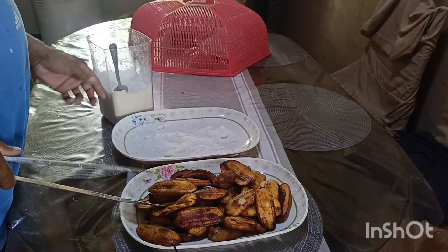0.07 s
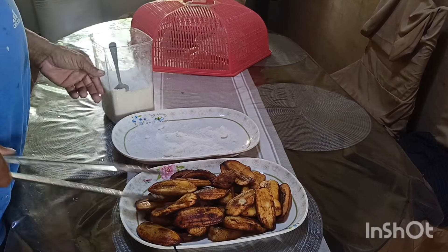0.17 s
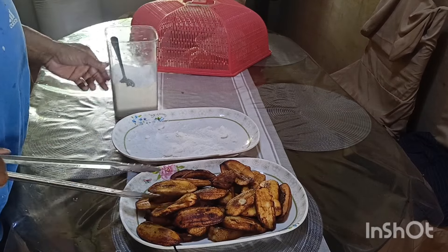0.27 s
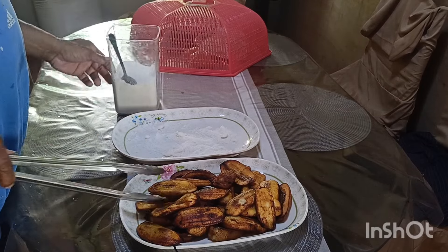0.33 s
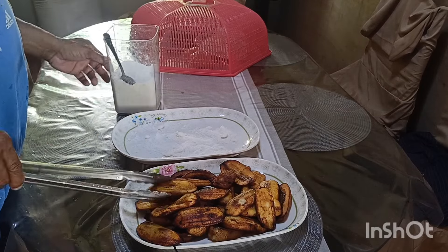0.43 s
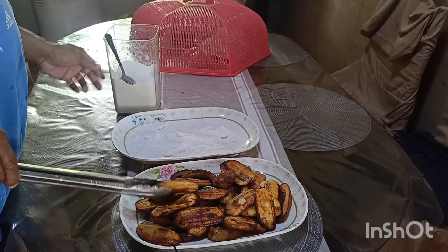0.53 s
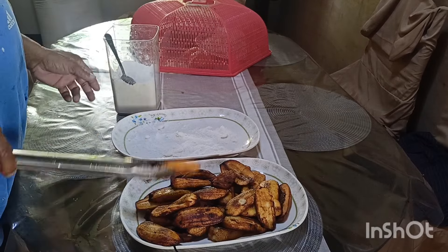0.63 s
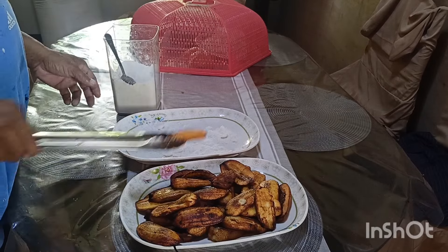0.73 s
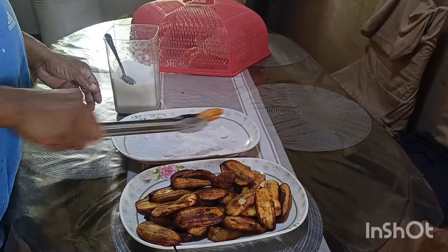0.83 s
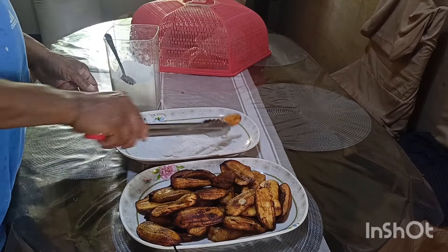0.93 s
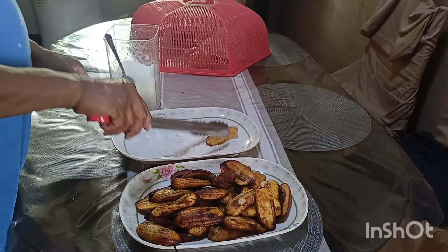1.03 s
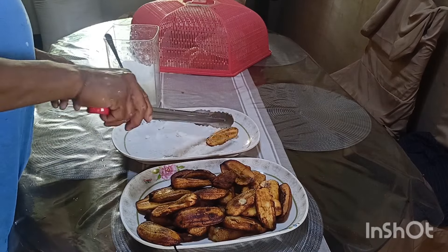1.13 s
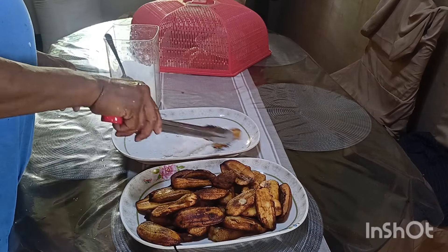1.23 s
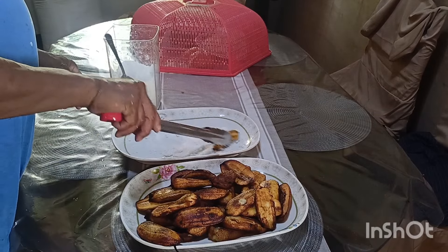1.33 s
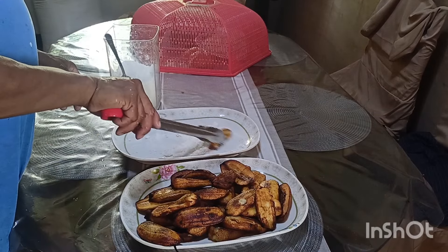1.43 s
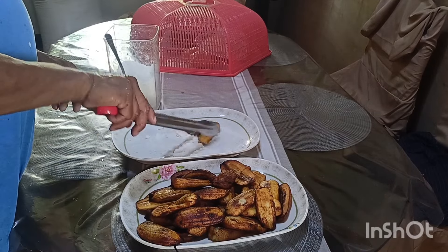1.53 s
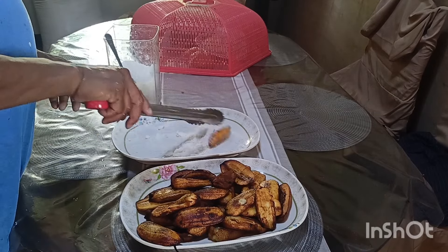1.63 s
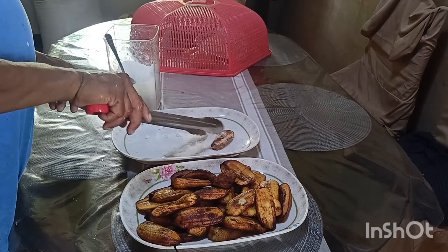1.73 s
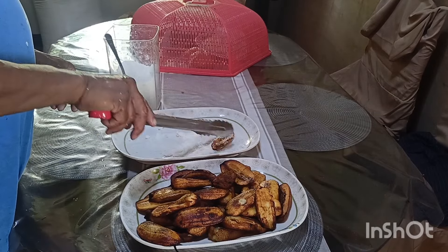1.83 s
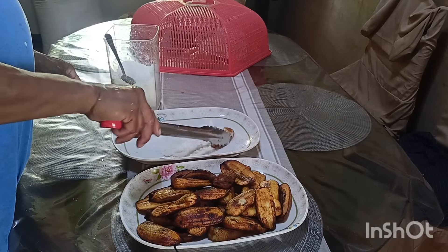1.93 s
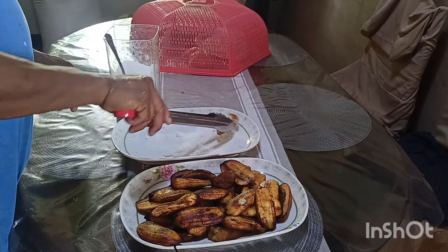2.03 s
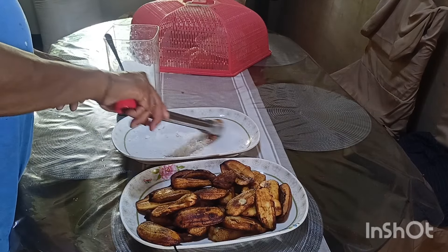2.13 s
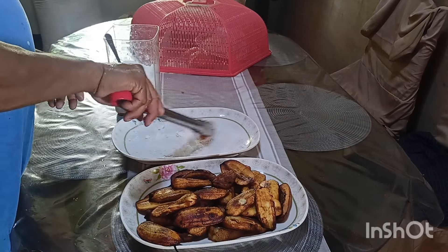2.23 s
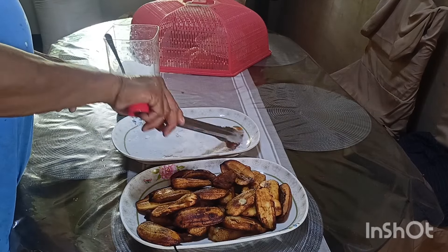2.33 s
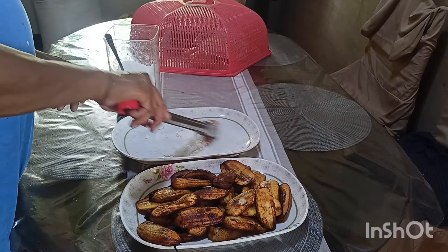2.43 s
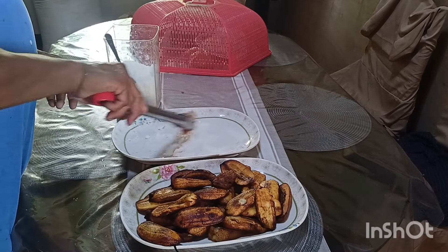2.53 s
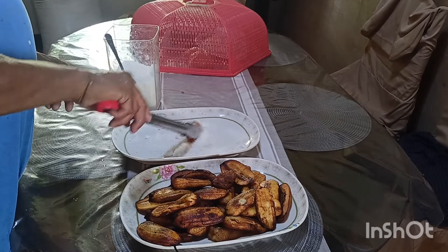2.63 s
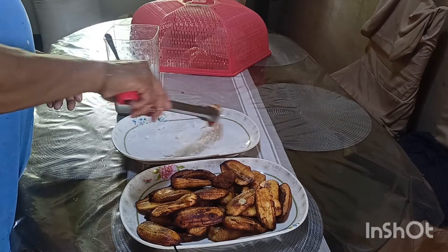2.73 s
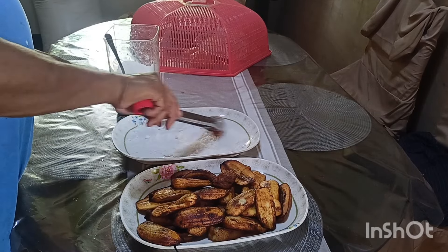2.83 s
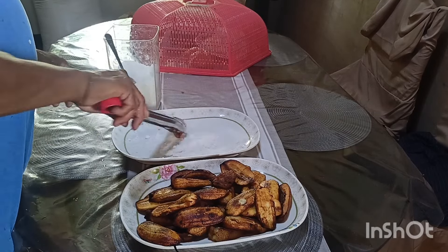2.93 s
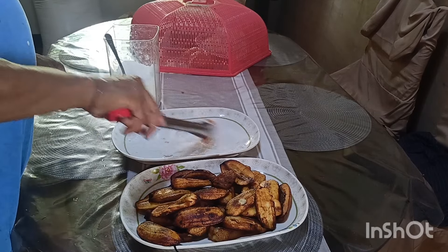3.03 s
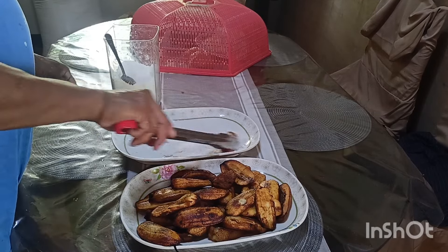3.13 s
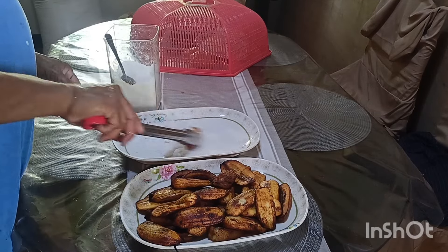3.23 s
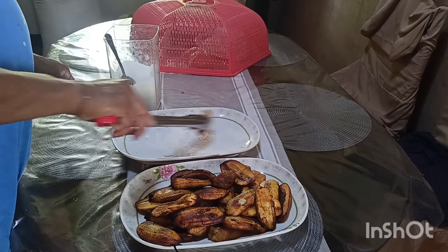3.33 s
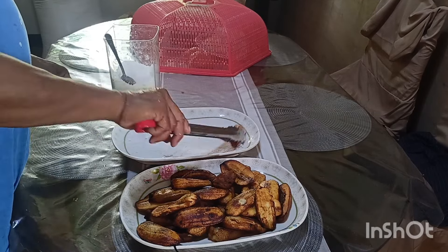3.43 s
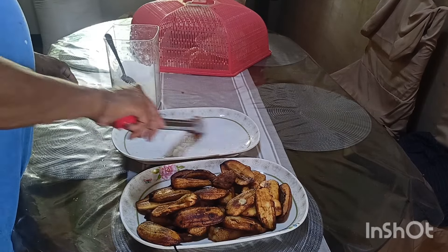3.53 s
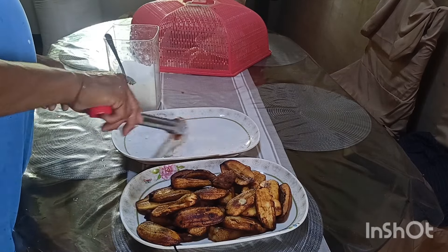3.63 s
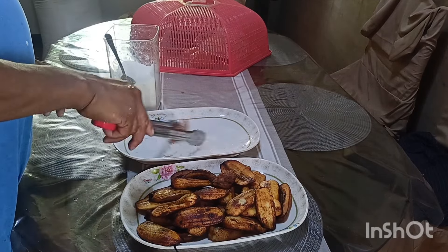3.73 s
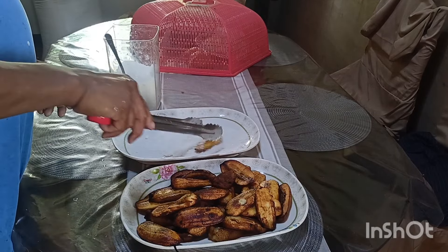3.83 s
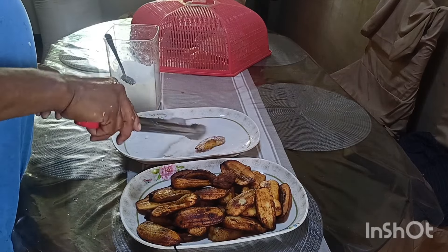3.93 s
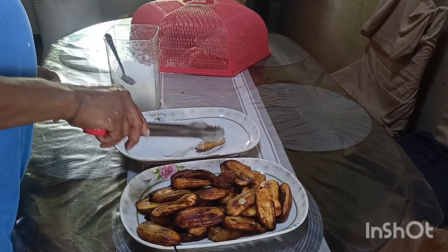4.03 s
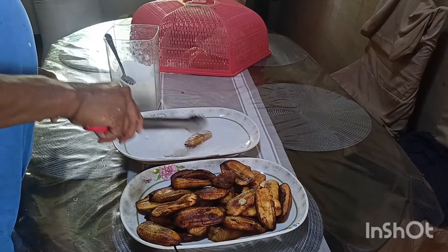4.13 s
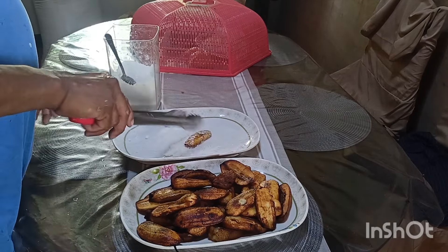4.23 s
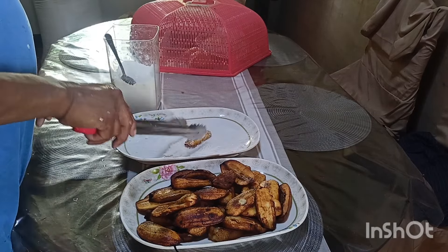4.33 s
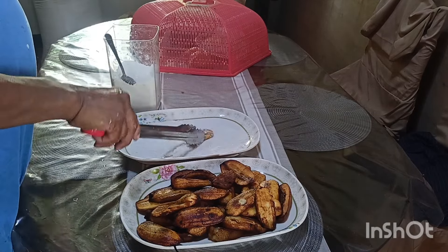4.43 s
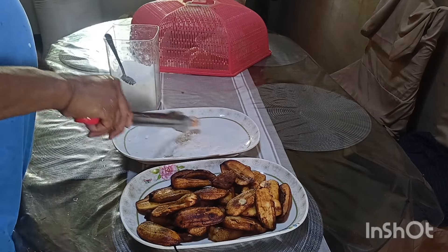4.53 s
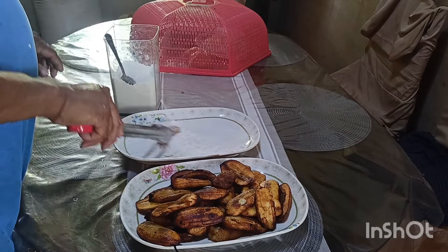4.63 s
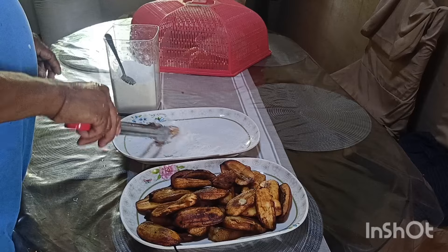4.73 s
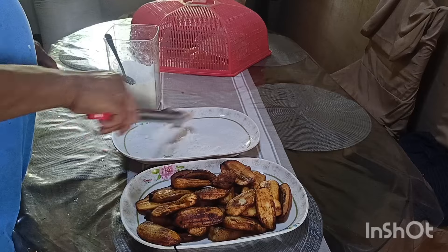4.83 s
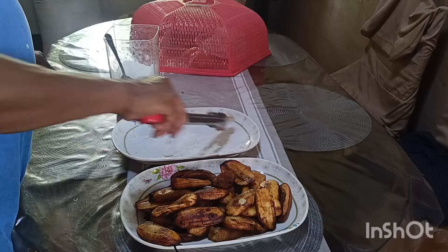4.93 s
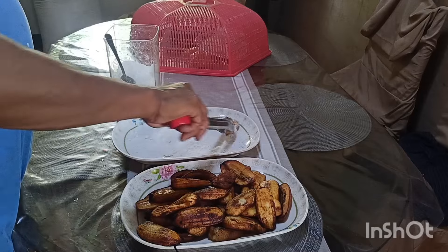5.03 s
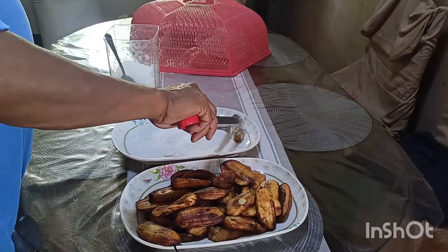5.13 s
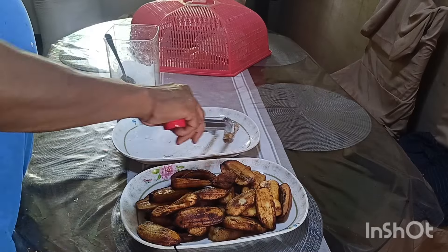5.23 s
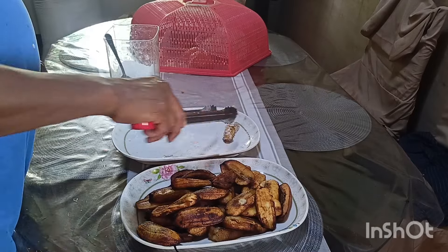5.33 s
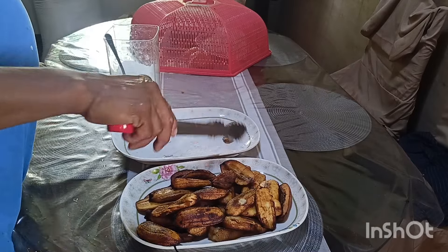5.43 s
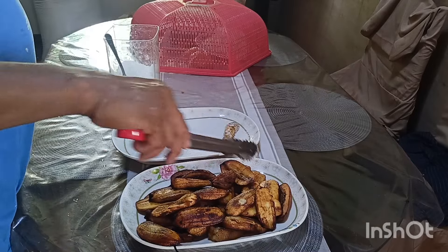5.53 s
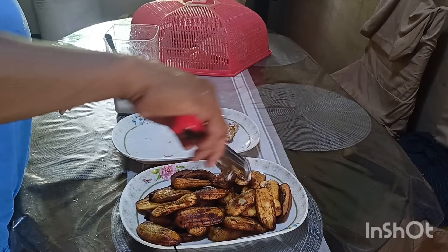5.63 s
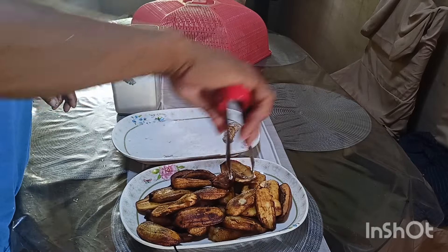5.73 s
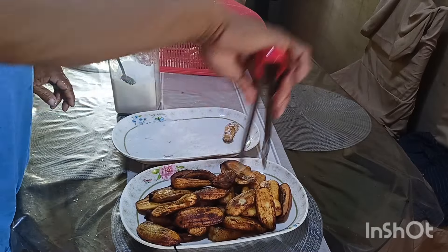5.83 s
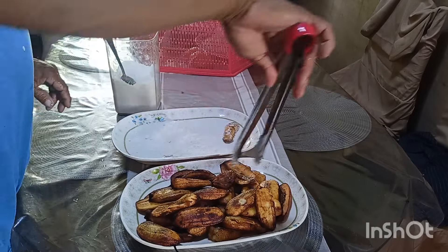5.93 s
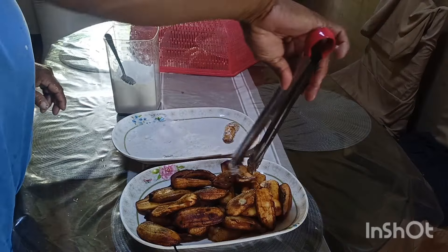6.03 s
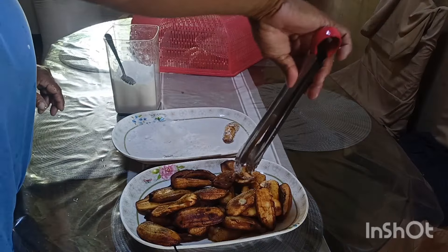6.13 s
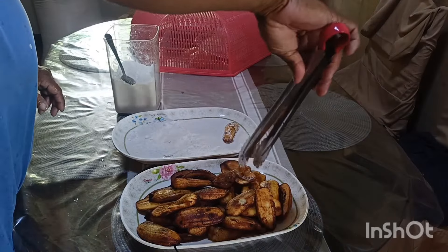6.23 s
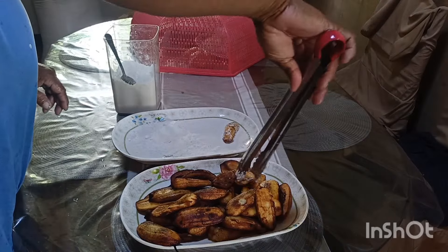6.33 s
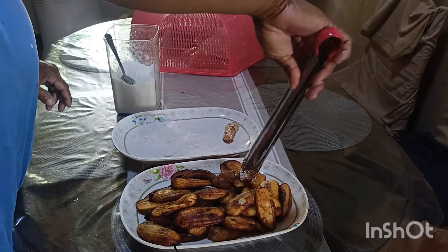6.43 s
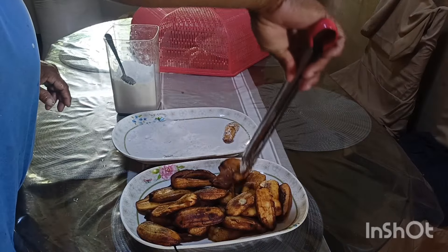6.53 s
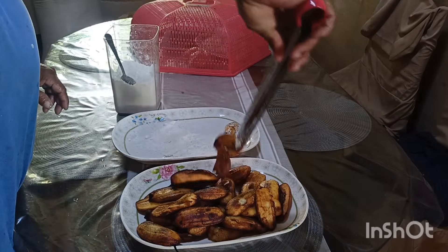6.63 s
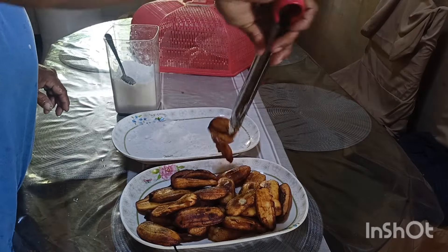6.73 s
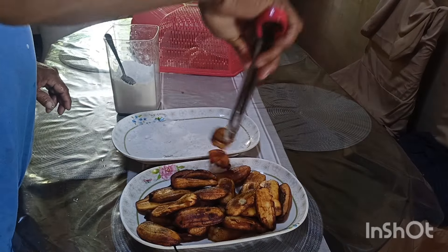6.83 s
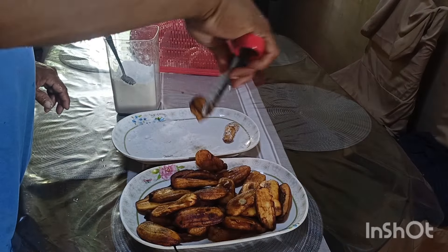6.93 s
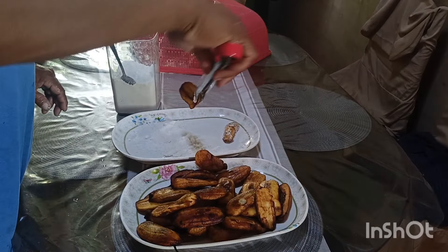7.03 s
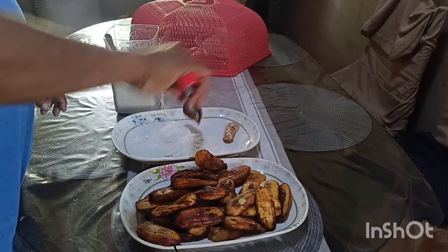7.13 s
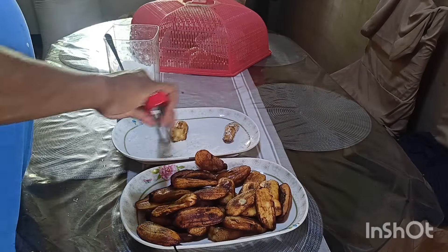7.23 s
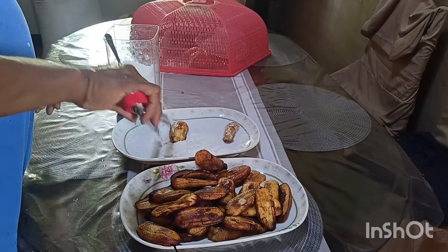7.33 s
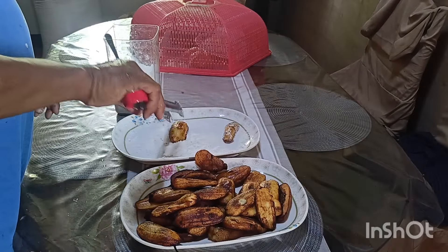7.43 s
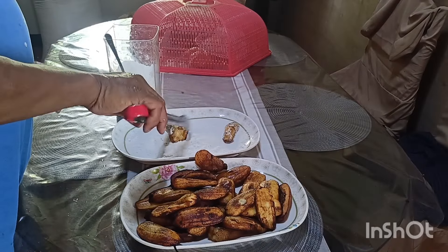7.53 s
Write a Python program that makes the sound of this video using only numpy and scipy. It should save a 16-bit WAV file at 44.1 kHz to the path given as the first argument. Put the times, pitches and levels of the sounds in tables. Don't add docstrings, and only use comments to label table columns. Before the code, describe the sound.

Metal tongs scrape gritty sugar across a ceramic plate, with sharp clinks and short rings, over a faint indoor fan hum.

```python
import sys
import numpy as np
from scipy import signal
from scipy.fft import irfft, next_fast_len
from scipy.io import wavfile
from scipy.ndimage import uniform_filter1d

SR = 44100
rng = np.random.default_rng(int(sys.argv[2]) if len(sys.argv) > 2 else 0)


def wrap_up_sound(samples):
    columns = np.atleast_2d(samples).T
    tamed = np.clip(columns, -1, 1)
    steps = np.round(tamed * 32767).astype(np.int16)
    wavfile.write(sys.argv[1], SR, steps)


def gain_from_db(level_db):
    decades = np.asarray(level_db, float) / 20
    return 10 ** decades


N = 333837


def evened(x):
    return x / np.sqrt(np.mean(x ** 2) + 1e-20)


def read(points, hz):
    f, value = np.transpose(points)
    return np.interp(np.log(hz + 1), np.log(f + 1), value)


def add(mix, s, sound):
    part = mix[:, round(s * SR):][:, :sound.shape[1]]
    part += sound[:, :part.shape[1]]


def causal(gain_db, size=4096):
    log_gain = np.log(gain_from_db(np.maximum(gain_db, -90)))
    log_gain = np.concatenate([log_gain, log_gain[-2:0:-1]])
    response = np.fft.ifft(np.exp(np.conj(signal.hilbert(log_gain)))).real[:size]
    return response / np.linalg.norm(response)


def fuzzy(hz, width):
    size = next_fast_len(N)
    off = np.fft.rfftfreq(size, 1 / SR) - hz
    near = np.flatnonzero(abs(off) < 8 * width)
    z = np.zeros(len(off), complex)
    a, b = rng.standard_normal((2, len(near)))
    z[near] = (a + 1j * b) * (1 + (2 * off[near] / width) ** 2) ** -1.5
    return evened(irfft(z, size)[:N])


def air():
    # (frequency [Hz], level per Hz [dB])
    air_curve = [(18, -70), (30, -43), (104, -1.5), (206, -11), (340, -7.5), (577, -16), (1270, -27),
                 (3130, -30), (6900, -33), (8400, -33.5), (9700, -38), (11100, -26), (12500, -42.5),
                 (16000, -29.5)]
    air_db = -62.5
    frames, hz = N // 256 + 5, np.fft.rfftfreq(1024, 1 / SR)
    a, b, patches = rng.standard_normal((frames, 513, 3)).T
    patches = uniform_filter1d(patches, 10, 0)
    patches = evened(uniform_filter1d(patches, 12, 1))
    z = (a + 1j * b) * gain_from_db(read(air_curve, hz)[:, None] + 1.3 * patches)
    hiss = signal.istft(z, nperseg=1024, noverlap=768)[1][:N]
    return gain_from_db(air_db - 3.5) * evened(hiss)


def fan():
    # (frequency [Hz], width [Hz])
    fan_tones = [(114, 13), (156.5, 14), (343.5, 7), (398, 8), (456, 8), (570.5, 8), (628, 10), (1717, 18),
                 (2370, 45), (4600, 70), (6060, 50), (8500, 120)]
    fan_levels = [-72.5, -73.5, -70.5, -77, -80.5, -81.5, -82, -92.5, -110.5, -95, -93, -89]
    turn = 2 * np.pi * np.arange(N) / SR
    hum = np.zeros(N)
    for (hz, width), db in zip(fan_tones, fan_levels):
        core = 0.9 * (hz < 700) * np.sin(hz * turn)
        hum += gain_from_db(db) * evened(fuzzy(hz, width) + core)
    return hum


def insects():
    # (frequency [Hz], width [Hz], level [dB], pulse rate [1/s])
    singers = [
        (11600, 520, -83.5, 147.),
        (11370, 260, -79, 180),
        (10800, 500, -84.5, 124.),
        (11150, 600, -81, 130),
    ]
    early_db, joins_s, rise_s = -6, 1.9, 0.6
    chorus = np.zeros(N)
    for hz, width, db, rate in singers:
        drift = evened(uniform_filter1d(rng.standard_normal(N), size=8000))
        turns = np.cumsum(rate * (1 + 0.039 * drift)) / SR
        pulses = np.exp(1.5 * np.cos(2 * np.pi * turns))
        chorus += gain_from_db(db) * evened(fuzzy(hz, width) * pulses)
    t = np.arange(N) / SR
    return chorus * gain_from_db(early_db / (1 + np.exp((t - joins_s) / rise_s)))


def rumble():
    band = signal.butter(3, [62, 190], "bandpass", fs=SR, output="sos")
    return gain_from_db(-73.5) * evened(signal.sosfilt(band, rng.standard_normal(N)))


def shares(db, body_db, top_db, rim_db):
    return gain_from_db(db + np.array([body_db, 0.67 * body_db + rim_db, 0 * db, top_db]))


def cluster(share, count=60):
    jitter, size, phase = rng.random((3, count, 1))
    t = np.arange(1100) / SR
    hz = 1100 + 170 * (np.arange(count)[:, None] + jitter)
    modes = (gain_from_db(14.3 * size) * np.sin(2 * np.pi * (hz * t + phase))).sum(0)
    modes = modes * gain_from_db(-60 * t / 0.042)
    modes = share * modes / np.linalg.norm(modes) + (t == 0)
    return modes / np.linalg.norm(modes)


def rubs():
    # (start [s], length [s], friction [dB], plate body re steel [dB])
    slides = [(.002, 0.35, -71, -3), (0.725, .34, -80, 3.5), (1.275, 0.24, -49.5, 0),
              (1.638, 0.28, -71.5, 1.5), (2.35, .1, -74, -18), (2.452, .095, -50, -10),
              (2.883, 0.087, -44.5, -1), (3.505, 0.091, -46, -7), (5.301, 0.18, -73.5, 13)]
    # (peak [s], friction [dB], swell [s], fade [s], plate body re steel [dB])
    drags = [(1.566, -30, 0.092, 0.07, -14), (2.188, -54.5, 0.32, 0.4, -2), (2.47, -40, 0.05, 0.05, -10),
             (2.62, -51, 0.0027, 0.021, -6), (2.682, -55.5, 0.074, 0.09, -24),
             (2.972, -37, 0.025, 0.075, -13.5), (3.146, -37, 0.0043, 0.19, -9),
             (3.247, -29, 0.016, 0.099, -20), (3.496, -29.5, 0.0026, .015, -9),
             (3.572, -36.5, 0.027, 0.13, -7), (3.896, -48, .05, 0.08, -11), (4.56, -58, .01, 0.088, -2),
             (4.706, -51.5, 0.081, 0.14, -8.5), (4.79, -55, 0.042, 0.089, -6.5),
             (5.2, -62, 0.27, 0.018, -3), (5.243, -57.5, 0.07, 0.0062, -7), (6.776, -74, .03, .15, 16),
             (7.25, -57, .008, .05, -9), (7.297, -53.5, 0.046, 0.016, -9), (7.38, -63, .01, 0.13, 0)]
    # (peak [s], friction
    # [dB], swell [s], fade [s])
    faint_drags = [(.322, -57.5, 0.027, 0.5), (1.13, -68.5, 0.28, 0.26), (1.262, -56, .03, .005),
                   (3.493, -52, .015, .004), (7.297, -50, .03, .004), (5.014, -61, 0.23, 0.064),
                   (5.736, -63.5, .05, .1), (5.848, -55, .009, .1), (6.052, -57.5, .02, .04),
                   (6.165, -66, 0.07, .05), (6.205, -64.5, .01, .06), (6.454, -54.5, 0.069, 0.17),
                   (6.928, -60, 0.018, .07), (7.458, -56.5, 0.04, 0.07), (7.565, -53, 0.057, .01)]
    faint_body_db = -16
    range_db, body_lag = 26.5, 0.39
    out = []
    for s, length, db, body in slides:
        count = round(length * SR)
        out.append((s, np.full(count, db), np.full(count, body)))
    for peak, db, swell, fade, body in drags + [row + (faint_body_db,) for row in faint_drags]:
        start = max(peak - 1.2 * swell, 0)
        t = np.arange(start, peak + 1.4 * fade, 1 / SR) - peak
        down_db = range_db * np.where(t < 0, -t / swell, t / fade)
        out.append((start, db - down_db, body + body_lag * down_db))
    return out


def strokes():
    out = np.zeros((4, N))
    sizes = gain_from_db(3.8 * np.minimum(rng.exponential(1, N), 3.0))
    grains = sizes * (rng.random(N) < 1500 / SR)
    clumps = gain_from_db(2.06 * evened(uniform_filter1d(rng.standard_normal(N), size=300)))
    grit = evened(grains * rng.standard_normal(N))
    grit = evened((0.5 * grit + rng.standard_normal(N)) * clumps)
    for s, db, body_db in rubs():
        rub = grit[round(s * SR):][:len(db)]
        t = np.arange(len(rub)) / SR
        db, body_db = db[:len(rub)], body_db[:len(rub)]
        edge = np.clip(np.minimum(t / 0.002, (t[-1] - t) / 0.024), 0, 1)
        rub = signal.fftconvolve(rub, cluster(0.4))[:len(t)]
        add(out, s, shares(db, body_db, -6 + 0 * db, -4.5) * edge * rub)
    return out * gain_from_db(-4.0)


def blows():
    # (time [s], blow [dB], plate body re steel [dB], room tail re blow [dB])
    light_ticks = [(.1174, -64, 6, -29), (.2104, -60.5, -9, 1.5), (0.3214, -46.5, -25, -2.5),
                   (0.488, -46.5, -20.5, -22), (.5666, -50.5, -15, -6.5), (1.0385, -50, -12, -5),
                   (2.6184, -58, -9, 3), (2.658, -56, -3, -3), (6.731, -70, 14, -20),
                   (4.6902, -50, -28, -22), (5.474, -63, -1, -29), (5.7314, -55, -18, -17),
                   (5.8481, -55, -22, -9), (6.0462, -53, -24, -11), (6.2, -54, -30, -16),
                   (6.3634, -50.5, -18, -10), (6.389, -51, -23, -15), (6.4313, -48, -24, -21),
                   (6.569, -52, -20, -16), (6.7615, -76, 19.5, -4.5), (7.444, -52, -16, -5),
                   (5.708, -57, -20, -16)]
    # (time [s], blow [dB], plate body re steel [dB], room tail re blow [dB], gate closes after [s])
    flat_taps = [(1.2635, -38, -38, -12, .084), (1.3068, -36, -34, -20, .11), (1.3125, -37, -34, -24, .11),
                 (1.3205, -34, -34, -20, .03), (1.3643, -39, -13.5, 2, 0.17), (1.5055, -33, -13, -21, .12),
                 (1.5529, -27.5, -35, -7, 0.092), (1.5764, -26, -15, -22, .14),
                 (1.9614, -17, -12, -13, 0.13), (2.1515, -36, -14, -16, .14), (2.9678, -31, -22, -12, .1),
                 (2.4906, -24, -34, -22, 0.05), (2.9238, -30.5, -18, -19, .11),
                 (2.9733, -24, -19, -24, 0.13), (3.1436, -36, -14, -8, .11), (3.2011, -30.5, -16, -4, .15),
                 (3.2324, -38, -27, -4, .05), (3.2455, -21, -41, -20, .11), (3.2514, -19, -28, -10, .11),
                 (3.494, -30, -22, -17, .13), (3.7803, -25, -15, -16.5, 0.095),
                 (3.7811, -13, -13.5, -16.5, 0.098), (4.455, -20, -10.5, -13, .1),
                 (3.8034, -27.5, -1, -13, 0.25), (6.4461, -44.5, -24, -10, .11),
                 (6.4567, -38, -27, -17, 0.12), (6.4826, -43, -30, -16, .11), (6.4845, -43, -28, -14, 0.1)]
    # (time [s], blow [dB], plate body re steel [dB], room tail re blow [dB], gate closes after [s])
    edge_taps = [(1.9388, -38, -30, 0, .02), (1.946, -13, -13, -11, .15), (2.8858, -32, -6, -13.5, 0.12),
                 (3.5703, -22.5, -20.5, -2, .1), (4.1061, -53.5, -20, -3, .14),
                 (4.124, -44.5, -14, -7, .15), (3.7782, -41, -25, -4, .02), (4.447, -50, -27, 0, .02),
                 (4.4524, -24, -11, -14, .1), (4.4584, -24.5, -11, -13, .1), (4.4498, -44, -15, -10, .02),
                 (5.2443, -34.5, -9, -13, .078), (4.6129, -50, -26, -9, .11),
                 (4.9072, -46.5, -15, -12, .11), (5.2457, -30.5, -11, -10.5, 0.076),
                 (6.9207, -47, -19, -15, .09), (7.2484, -44.5, -12, -8.5, .096),
                 (7.2978, -36, -14, -10, .083), (7.2996, -30, -7.5, -10, .083), (7.3028, -38, -6, -14, .08),
                 (7.5443, -48.5, -15, -12, .11)]
    # (time [s], blow [dB], plate body re steel [dB], room tail re blow [dB], gate closes after [s])
    arm_clacks = [
        (4.1634, -23, -56, -4, 0.15),
        (4.1754, -19, -29, -11, 0.14),
    ]
    ticks = [row + (0.14,) for row in light_ticks]
    kinds = [(edge_taps, -4), (flat_taps, -15.5), (arm_clacks, -3), (ticks, -18)]
    out = []
    for rows, top_db in kinds:
        for s, db, body_db, tail_db, gate_s in rows:
            out.append((s, db, body_db, top_db, tail_db, gate_s))
    return out


def taps():
    t, out = np.arange(10000) / SR, np.zeros((4, N))
    leak = 0.13
    for s, db, body_db, top_db, tail_db, gate_s in blows():
        z = rng.standard_normal(len(t))
        crack = z * gain_from_db(-60 * t / 0.016) * np.minimum(t / 0.0007, 1)
        crack = crack + 3.8 * (np.arange(len(t)) == 25)
        shut = leak + (1 - leak) / (1 + np.exp((t - gate_s) / 0.006))
        tail = z[::-1] * gain_from_db(tail_db - 60 * t / 0.32) * (1 - np.exp(-t / 0.0051))
        ringing = signal.fftconvolve(0.5 * crack + tail, cluster(0.6))[:len(t)]
        sound = 0.7 * crack + ringing * shut
        add(out, s, gain_from_db(-8.0) * shares(db, body_db + 8.0, top_db, -5.0)[:, None] * sound)
    return out


def rings():
    # (time [s], frequency [Hz], level [dB], lasts [s])
    plate_rings = [(.118, 414, -59, 0.017), (1.946, 436, -38, 0.1), (1.946, 700, -34, 0.114),
                   (1.946, 2100, -43, .07), (2.886, 600, -48, .03), (1.946, 927, -39, 0.11),
                   (1.946, 308, -39.5, 0.053), (1.945, 1900, -39.5, 0.069), (3.781, 402.4, -41, 0.2),
                   (3.781, 2080, -50, 0.04), (3.781, 934, -46, 0.16), (4.454, 602, -41, 0.09),
                   (4.454, 711, -50, .07), (4.454, 1100, -48, .06), (3.781, 590, -37, .1),
                   (3.779, 1804, -49, .1), (4.453, 428.7, -38, 0.105), (4.454, 361, -48, 0.14),
                   (5.241, 715, -48, 0.078), (6.758, 980, -62, .012), (5.241, 935, -47, 0.098),
                   (5.245, 1470, -54, .083), (7.298, 606, -44.5, 0.083), (7.306, 800, -50, .06),
                   (7.306, 310, -52, .07)]
    # (time [s], frequency [Hz], level [dB], lasts [s])
    steel_rings = [(1.946, 3885, -41.5, 0.098), (1.948, 4400, -56, .12), (1.942, 6140, -45, .12),
                   (3.567, 8760, -39, 0.086), (4.161, 6980, -42, 0.14), (4.17, 7670, -40, 0.12),
                   (4.163, 3434, -46, 0.145), (4.163, 5839, -40, 0.15), (7.298, 5220, -55.5, .079),
                   (5.245, 5200, -55, .06), (3.494, 5800, -53, .05), (4.163, 4270, -48, 0.15),
                   (4.163, 7400, -47, .14), (4.163, 6490, -47, .14), (4.163, 7290, -43, .14),
                   (6.457, 3200, -65, .02), (6.484, 3200, -65, .03), (3.144, 5300, -47, .04)]
    # (time [s], frequency [Hz], level [dB], lasts [s])
    dull_rings = [(1.036, 2940, -61, 0.03), (1.263, 8120, -42, 0.06), (1.946, 2947, -35.5, 0.12),
                  (4.454, 7970, -40, 0.064), (5.239, 5140, -53, 0.085), (5.243, 782, -42.5, 0.076),
                  (6.77, 800, -64, .08), (4.165, 3600, -44, .14), (4.165, 4600, -46, .14),
                  (3.2455, 8500, -36, .03), (3.2514, 5800, -40, .02), (3.566, 8000, -41, .07),
                  (2.9678, 7600, -44, .03), (1.3205, 8200, -42, .01), (2.452, 8100, -50, .045),
                  (6.457, 4100, -58, .02), (6.484, 4450, -58, .03), (6.484, 8000, -57, .01)]
    # (time [s], frequency [Hz], level [dB], lasts [s])
    squeaks = [(1.264, 4520, -54, 0.083), (1.306, 7460, -47, .019), (1.364, 5210, -56, 0.14),
               (2.659, 620, -55, 0.043), (4.647, 1500, -64.5, 0.05), (1.64, 590, -65, 0.18),
               (1.5, 5210, -54, .09)]
    # (time [s], frequency [Hz], level [dB], lasts [s])
    knocks = [(4.4524, 401, -27, 0.017), (4.4524, 616, -32, 0.018), (3.7811, 370, -30, 0.015),
              (1.946, 950, -30, .02), (5.2443, 794, -38, .02), (7.2996, 550, -42, .02),
              (1.2635, 8100, -38, .005)]
    # (width [Hz], time to fall 60 dB [s])
    ring_kinds = [
        (22, 0.33),
        (55, .32),
        (316, 0.29),
        (70, 1.2),
        (20, 0.044),
    ]
    t, out = np.arange(9500) / SR, np.zeros((1, N))
    times, strength = np.transpose(blows())[:2]
    tables = zip([plate_rings, steel_rings, dull_rings, squeaks, knocks], ring_kinds)
    sung = [row + kind for rows, kind in tables for row in rows]
    for s, hz, db, lasts, width, t60 in sung:
        a, b = rng.standard_normal((2, len(t)))
        nearest = times[np.argmin(abs(times - s) - strength / 2500)]
        s = nearest if abs(nearest - s) < 0.012 else s
        r = np.exp(-np.pi * width / SR)
        flutter = signal.lfilter([np.sqrt(1 - r * r)], [1, -r], a + 1j * b, zi=[2.47 + 0j])[0]
        shut = (1 - np.exp(-t / 0.00087)) / (1 + np.exp((t - lasts) / 0.0083))
        tone = (flutter * np.exp(2j * np.pi * hz * t)).imag
        add(out, s, (gain_from_db(db - 60 * t / t60) * shut * tone)[None])
    return out[0]


def parts():
    # (frequency [Hz], level [dB], relative ring time [1])
    plate_modes = [(392.5, -4.5, 0.26), (436, -7.5, 1), (596, 10.5, 0.13), (689, 2, 0.028),
                   (726, -27, 0.25), (814, -19, 0.63), (960, -15.5, 1)]
    # (frequency [Hz], width [Hz], level [dB])
    steel_modes = [(3020, 53, 3), (3450, 34, -19.5), (5176, 61, 0.5), (5800, 150, -15), (5850, 58, -6),
                   (7330, 78, -4), (7750, 53, -14), (7800, 28, -5.5), (9140, 64.3, -11), (8760, 18, -9.5),
                   (9160, 90.5, -4.5), (10030, 44, -12), (10550, 33, -6)]
    # (frequency [Hz], level per Hz [dB])
    bright_curve = [(1530, -53.5), (2950, -19), (3350, -7), (3900, -6.5), (5080, -5), (6350, -6), (8050, 0),
                    (9610, -9.5), (12400, -13.5), (16200, -49), (22000, -120)]
    # (frequency [Hz], level per Hz [dB])
    middle_curve = [(600, -32), (850, -1.5), (1150, -1), (1500, 0.5), (2100, -2.5), (2750, -5.5),
                    (3600, -22)]
    # (frequency [Hz], level per Hz [dB])
    top_curve = [(10500, -42), (12500, -6), (14500, -2), (15900, 1.5), (17500, -37)]
    hz, t = np.fft.rfftfreq(16384, 1 / SR), np.arange(8192) / SR
    body = np.zeros(len(t))
    for f, db, t60 in plate_modes:
        body += gain_from_db(db - 60 * t / (0.19 * t60)) * np.sin(2 * np.pi * f * t)
    peaks = np.zeros(len(hz))
    for f, width, db in steel_modes:
        peaks += gain_from_db(2 * (db + 2.5)) / (1 + (2 * (hz - f) / width) ** 2)
    rim = causal(read(middle_curve, hz))
    steel = causal(read(bright_curve, hz) + 10 * np.log10(1 + peaks))
    return body / np.linalg.norm(body), rim, steel, causal(read(top_curve, hz))


def gate(ware):
    opens_db, soft_db, lag_s = -53, 3.5, 0.044
    power_db = 10 * np.log10(abs(uniform_filter1d(ware ** 2, size=600)) + 1e-12)
    r = np.exp(-1 / (lag_s * SR))
    return signal.lfilter([1 - r], [1, -r], 1 / (1 + np.exp((opens_db - power_db) / soft_db)))


def scene():
    drive = strokes() + taps()
    ware = sum(signal.oaconvolve(d, p)[:N] for d, p in zip(drive, parts())) + rings()
    opened = gate(ware)
    room = rumble() * gain_from_db(16 * opened) + (air() + fan()) * gain_from_db(8 * opened)
    no_bass = signal.butter(4, 260, "highpass", fs=SR, output="sos")
    return (signal.sosfilt(no_bass, ware) + room + insects())[None]


def band_limit(x):
    return signal.sosfilt(signal.butter(12, 17000, fs=SR, output="sos"), x)


def record(dry):
    edge = signal.firwin(511, 15900, window=("kaiser", 4), fs=SR)[None]
    return band_limit(signal.oaconvolve(dry, edge, "same"))


dry = scene()
out = record(dry)
wrap_up_sound(out)
```